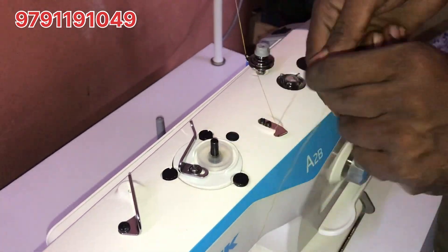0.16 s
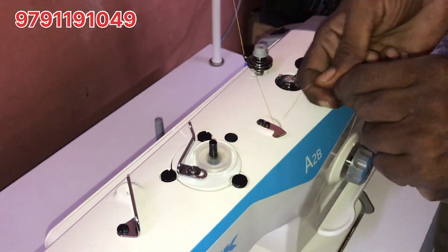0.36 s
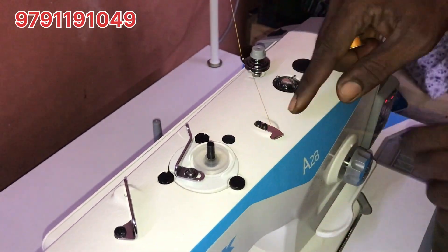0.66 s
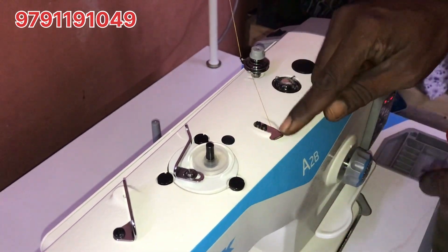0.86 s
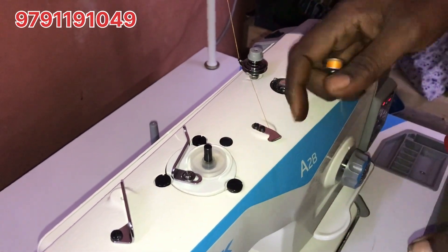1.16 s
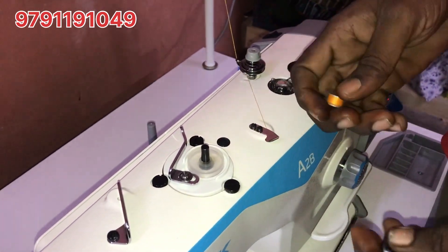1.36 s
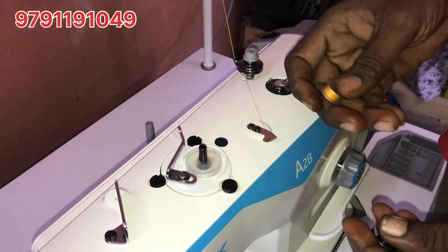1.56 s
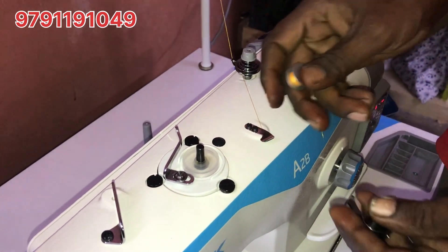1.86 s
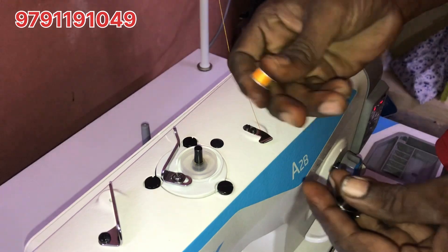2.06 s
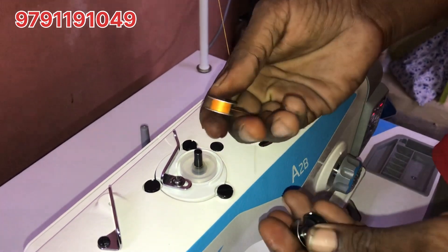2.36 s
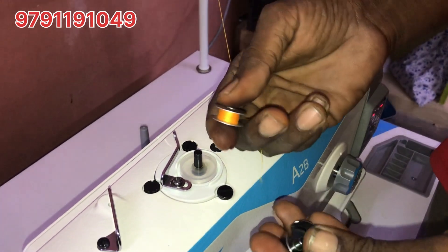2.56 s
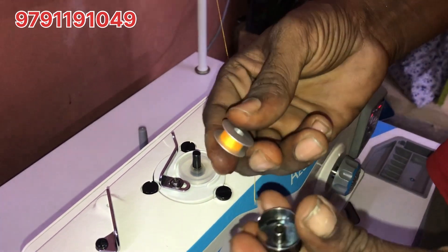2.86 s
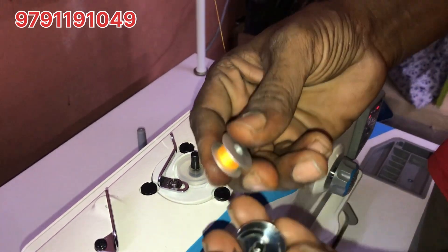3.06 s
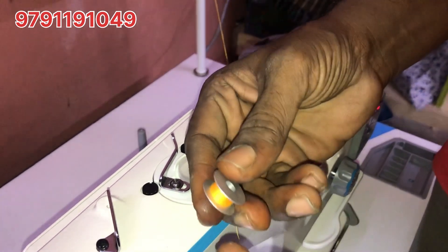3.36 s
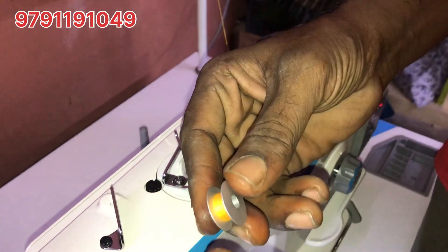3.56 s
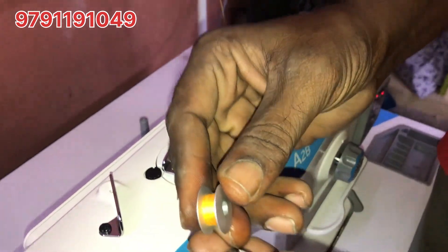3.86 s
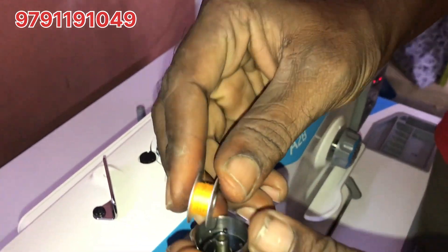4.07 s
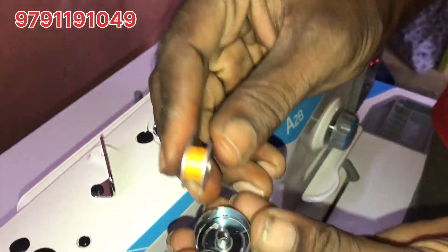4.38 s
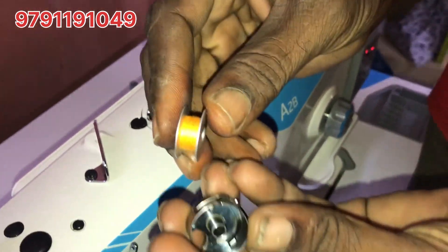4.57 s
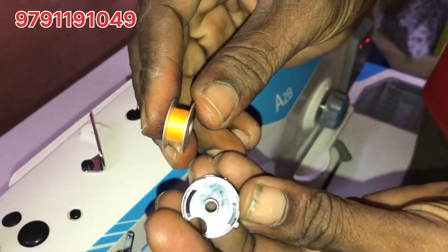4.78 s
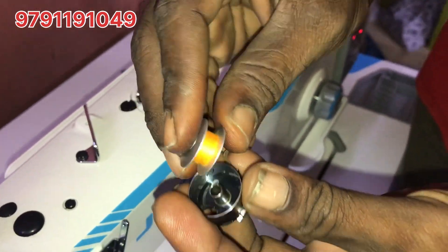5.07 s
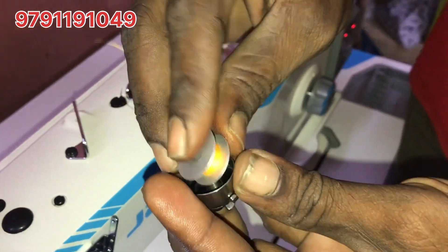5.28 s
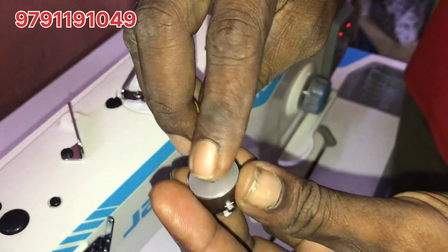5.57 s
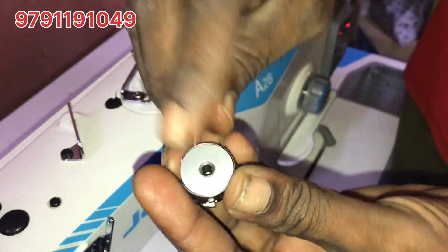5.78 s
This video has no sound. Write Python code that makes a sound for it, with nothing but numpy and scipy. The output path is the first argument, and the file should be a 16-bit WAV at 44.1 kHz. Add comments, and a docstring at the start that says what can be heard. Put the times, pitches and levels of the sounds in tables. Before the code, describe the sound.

A dull metallic clack dies away over a brief hiss of thread. An industrial sewing machine then clicks in, spurts up to speed, sags for a moment and picks up again. It runs fast and steady from there, with rapid clatter, a bright sizzle and a table-shaking hum, joined by buzz and whine. It is heard from close above the machine in a small workshop.

```python
"""A dull clack dies away over a brief hiss of thread; then an industrial sewing machine clicks in.
Heard from close above its head in a small workshop, it spurts, sags, then runs at about 3600 rpm.
The shaft shakes the table, the linkage clatters and the hook sizzles on every turn; a geared shaft
makes the pattern recur every seven turns. At steady speed the drive's rasp gives way to hum, buzz
and whine. Levels follow the speed, the pull of speeding up and the nearness of the microphone."""
import sys
import numpy as np
from scipy import signal
from scipy.fft import rfft, irfft, next_fast_len
from scipy.io import wavfile
from scipy.ndimage import map_coordinates

SR = 44100
rng = np.random.default_rng(int(sys.argv[2]) if len(sys.argv) > 2 else 0)


def waveform_to_disk(signal):
    """Save audio, clipped to [-1, 1], as 16-bit WAV at the path in sys.argv[1]."""
    frames = np.transpose(np.atleast_2d(signal))
    scaled = np.clip(frames, -1, 1) * 32767
    samples = np.round(scaled).astype(np.int16)
    wavfile.write(sys.argv[1], SR, samples)


N = 261292
TIME_S = np.arange(N) / SR
FULL_SPEED_HZ, GEAR_CYCLE_TURNS = 59.705, 7

# Main shaft speed. Each row: time in seconds, share of full speed.
SHAFT_SPEED = [(.315, 0), (.38, .6), (.435, 1), (.51, 1.005), (.61, .77), (.69, .55), (.75, .48), (.80, .8),
               (.835, 1.01), (.89, 1.022), (.97, 1.006), (1.15, 1)]
# Microphone nearness, rising overall. Each row: time in seconds, relative level of the shaft's hum in dB.
NEARNESS = [(1.1, -31.5), (1.35, -30.5), (2.17, -31), (3.97, -27), (5.9, -25)]
# Pitched modes of the clack. Each row: frequency in Hz, starting rms level in dB, T60 in seconds.
CLACK_MODES = [(552, -38, 0.45), (687, -31, 0.28), (896, -40, 0.28), (1310, -39, 0.29), (1810, -49, .3)]
# Dense modes of the clack. Each row: frequency in Hz, relative density in dB.
CLACK_SPECTRUM = [(88, -46), (150, -4.5), (477, -13), (687, -4), (742, -16), (1030, -13), (1200, -17),
                  (1320, -15.5), (1980, -18), (2140, -18), (2450, -23), (6060, -29), (15000, -46)]
# Thread hiss in the guides. Each row: frequency in Hz, relative density in dB.
THREAD_SPECTRUM = [(1500, -2), (3500, -2), (6500, -2), (7500, -8), (8500, -1), (9800, -20), (12300, -3),
                   (13300, -10), (14200, 0), (16000, -15)]
# Workshop background. Each row: frequency in Hz, relative density in dB.
ROOM_SPECTRUM = [(30, -36), (50, -3), (75, -7), (110, 6.5), (147, -10), (180, 3.5), (230, -16.5),
                 (650, -17), (1500, -27), (4000, -37.5), (9000, -35), (16000, -41)]
# Click of the drive. Each row: frequency in Hz, relative density in dB.
CLICK_SPECTRUM = [(400, -25), (1900, -2), (2600, -7), (3800, 1), (6000, -9), (8600, 1), (11000, -14),
                  (14000, 8), (16000, -10)]
# Rasp of the drive. Each row: frequency in Hz, relative density in dB.
RASP_SPECTRUM = [(1000, -8.5), (1500, -4), (1900, -4), (2300, -9), (2780, -2.5), (3300, -11), (4600, -29),
                 (7000, -38)]
# Machine rumble. Each row: frequency in Hz, relative density in dB.
RUMBLE_SPECTRUM = [(30, -30), (55, -14), (75, 13), (105, -11), (150, 1), (225, -29), (285, 6), (440, -19),
                   (550, 7), (680, 2), (850, -25)]
# Table and stand modes. Each row: frequency in Hz, width in Hz, gain over the direct shake in dB.
TABLE_MODES = [(95.4, 15, 12.5), (181.38, 3.5, 23), (297.3, 3.6, 12)]
# Shaft orders shaking the table. Each row: multiple of shaft rate, relative level at full speed in dB.
SHAKE_ORDERS = [(2, -10), (3, 0), (4, -20), (5, -15), (6, -26), (7, -24.5), (8, -36), (9, -25.5), (10, -25),
                (11, -16.5), (12, -25)]
# Linkage contacts. Each row: angle in turns, half-width in turns, relative clatter and sizzle in dB.
STROKES = [(.14, 0.1, -1, -14), (.40, 0.05, -11, -1), (.56, 0.12, 5, -2), (.66, 0.045, -1, -15),
           (.77, 0.015, -11, 0), (.90, 0.19, 0, -7)]
# Exactly recurring part of the roughness. Each row: frequency in Hz, share of power.
RECURRING_SHARE = [(500, 0.32), (1100, 0.25), (2200, 0.81), (5000, 0.55), (7500, 0), (10000, 0.05),
                   (14000, .05)]
# Peaks and notches of the cast head. Each row: frequency in Hz, width in Hz, gain in dB.
HEAD_MODES = [(2040, 78, 2), (2690, 130, -2), (3340, 180, 2.5), (5160, 210, -0.5), (4860, 360, -2.5),
              (6090, 270, 7), (7300, 160, 2), (9350, 460, 3), (10300, 450, -3)]
# Broad colour of the casting. Each row: frequency in Hz, relative gain in dB.
CASTING_SPECTRUM = [(240, -24.5), (400, -11), (449, -14.5), (469, -6), (643, -8.5), (846, -13),
                    (909, -12.5), (1200, -11.5), (1890, -9), (2160, -11), (2420, -6.5), (3620, -11),
                    (5190, -8.5), (5660, -16), (12500, -17), (16200, -29), (22000, -120)]
# Hook and needle bar sizzle. Each row: frequency in Hz, relative density in dB.
SIZZLE_SPECTRUM = [(11000, -14), (12500, -14), (13100, -2), (13900, 1), (14900, -8), (15400, -1.5),
                   (15700, 5.5), (16000, -6.5)]
# Low gear tones. Each row: nominal full-speed frequency in Hz, rms level in dB, dB per dB of nearness.
HUM_TONES = [(68.2, -49, -1.3), (127.9, -40, -1.9), (290, -46.5, -0.23), (375.3, -39.5, 0)]
# Colour of the high shaft orders. Each row: full-speed frequency in Hz, relative level in dB.
BUZZ_SPECTRUM = [(900, 1.5), (1100, -3), (1400, 1.5), (1950, 0.5), (2400, 0), (2650, -11), (3100, -1.5),
                 (4200, -7.5), (4650, -0.5), (5400, 1)]
# Gear and bearing partials.
# Each row: nominal full-speed frequency in Hz, rms level in dB, dB per dB of nearness.
WHINE_TONES = [(1075, -51, 1.8), (1135, -51, -1.1), (1373, -47.5, .5), (1851, -46.5, -.7), (1876, -44, -.7),
               (1911, -43, .3), (2422, -46, -.4), (2448, -40, -1.0), (2627, -44.5, -1.2), (3343, -45, -1.6),
               (4691, -44.5, .3), (4776, -45, -.7), (5135, -46, -.5), (5254, -46, -.1)]


def from_db(db):
    """Decibels to gain."""
    return 10 ** (np.asarray(db) / 20)


def unit_rms(x):
    """Scale to rms 1."""
    return x / np.sqrt(np.mean(x ** 2) + 1e-20)


def at_hz(spectrum, hz):
    """Read a spectrum on a log-frequency axis."""
    knots_hz, values = np.transpose(spectrum)
    return np.interp(np.log(np.maximum(hz, 1)), np.log(knots_hz), values)


def filtered(x, gain_at):
    """Apply a gain given as a function of Hz."""
    size = next_fast_len(N + SR)
    hz = np.arange(size // 2 + 1) * SR / size
    return irfft(rfft(x, size) * gain_at(hz), size)[:N]


def coloured(x, spectrum):
    """Shape x by a spectrum; rms 1."""
    return unit_rms(filtered(x, lambda hz: from_db(at_hz(spectrum, hz))))


def noise():
    """White noise."""
    return rng.standard_normal(N)


def drift(rate_hz):
    """Random wander, rms 1, with rate_hz new values a second."""
    knots = rng.standard_normal(1024)
    return unit_rms(np.interp(TIME_S * rate_hz, np.arange(len(knots)), knots))


def sine(cycles):
    """Sine of rms 1, random starting phase."""
    return np.sqrt(2) * np.sin(2 * np.pi * (cycles + rng.random()))


def lagged(x, lag_s):
    """One-pole lag."""
    pole = np.exp(-1 / (lag_s * SR))
    return signal.lfilter([1 - pole], [1, -pole], x)


def knock(spectrum, start_s, level_db, t60_s):
    """Metal knock whose dense modes decay together."""
    age_s = TIME_S - start_s
    envelope = (age_s >= 0) * from_db(level_db - 60 * np.maximum(age_s, 0) / t60_s)
    return envelope * coloured(noise(), spectrum)


def clack():
    """Dull knock on the machine with a few brief ringing tones."""
    ring = sum(from_db(db - 60 * TIME_S / t60_s) * sine(hz * TIME_S) for hz, db, t60_s in CLACK_MODES)
    return ring + knock(CLACK_SPECTRUM, start_s=0, level_db=-23.5, t60_s=.39)


def thread_hiss(end_s=.25, t60_s=.11, flutter_db=2.5):
    """Thread drawn through the guides hisses unevenly until the hand lets go."""
    release_db = -60 * np.maximum(TIME_S - end_s, 0) / t60_s
    return from_db(-50 + release_db + flutter_db * drift(32)) * coloured(noise(), THREAD_SPECTRUM)


def room_tone():
    """Steady, mostly low workshop background."""
    return from_db(-37.5) * coloured(noise(), ROOM_SPECTRUM)


def with_walls(x, t60_s=.22, wet_db=-7, gap_s=.004):
    """Close walls add a short dense tail."""
    age_s = TIME_S[:SR // 2]
    tail = rng.standard_normal(len(age_s)) * from_db(-60 * age_s / t60_s) * (age_s > gap_s)
    return x + from_db(wet_db) * signal.fftconvolve(x, tail / np.linalg.norm(tail))[:N]


def drive_click():
    """The drive engages with a short bright knock."""
    return knock(CLICK_SPECTRUM, start_s=.3125, level_db=-23.5, t60_s=.026)


def drive_rasp(speed, pull, settled):
    """The drive rasps while pulling up to speed and fades as it settles."""
    envelope = from_db(-47) * pull + from_db(-36) * np.sqrt(speed) * (1 - settled)
    return envelope * coloured(noise(), RASP_SPECTRUM)


def rumble(speed, pull):
    """Low noise that grows with speed and pull."""
    return (from_db(-40) * np.sqrt(speed) + from_db(-53) * pull) * coloured(noise(), RUMBLE_SPECTRUM)


def table_response(hz):
    """Complex gain: direct shake plus the table's modes."""
    return 1 + sum(from_db(db) / (1 + 2j * (hz - mode_hz) / width_hz)
                   for mode_hz, width_hz, db in TABLE_MODES)


def table_drone(turns, speed, pull, steady, near_db, jolt_db=1.1, waver_db=.24):
    """Shaft orders shake the ringing table; the pull jolts the low ones, the rest need steady speed."""
    force = 0
    for order, db in SHAKE_ORDERS:
        gain = from_db(db + waver_db * drift(8.2)) / np.abs(table_response(order * FULL_SPEED_HZ))
        drive = from_db(jolt_db * pull) if order <= 5 else steady
        force = force + gain * drive * sine(order * turns)
    return from_db(-22 + .47 * near_db) * filtered(force * speed ** 1.1, table_response)


def roughness(turns, period_turns):
    """Grain of metal faces that come round every period_turns."""
    grain = rng.standard_normal(int(period_turns * SR / FULL_SPEED_HZ))
    position = turns / period_turns % 1 * len(grain)
    return unit_rms(map_coordinates(grain, [position], order=3, mode="grid-wrap"))


def contact_force(turns, layer, sliding_db, spread_db):
    """Steady sliding plus each turn's strokes, no two equally hard."""
    power = from_db(sliding_db) ** 2
    for angle_turns, width_turns, clatter_db, sizzle_db in STROKES:
        stroke_db = clatter_db if layer == "clatter" else sizzle_db
        strengths = from_db(stroke_db + spread_db * rng.standard_normal(512))
        turn, phase = np.divmod(turns - angle_turns + .5, 1)
        pulse = np.exp(-((phase - .5) / width_turns) ** 2)
        power = power + strengths[turn.astype(int)] ** 2 * pulse
    return np.sqrt(power)


def head_response(hz):
    """Gain of the cast head's peaks and notches."""
    return from_db(sum(db / (1 + (2 * (hz - mode_hz) / width_hz) ** 2)
                       for mode_hz, width_hz, db in HEAD_MODES))


def linkage_clatter(turns, load, near_db, shaft_share=.025):
    """Contacts ride over recurring roughness and loose play, and sound through the cast head."""
    shaft = np.sqrt(shaft_share) * roughness(turns, 1)
    gear = np.sqrt(1 - shaft_share) * roughness(turns, GEAR_CYCLE_TURNS)
    recurring = filtered(shaft + gear, lambda hz: np.sqrt(at_hz(RECURRING_SHARE, hz)))
    play = filtered(noise(), lambda hz: np.sqrt(1 - at_hz(RECURRING_SHARE, hz)))
    contacts = (recurring + play) * contact_force(turns, "clatter", sliding_db=2.5, spread_db=1.9)
    head = coloured(filtered(contacts, head_response), CASTING_SPECTRUM)
    return from_db(-28.5 + .2 * near_db) * load ** 2.03 * head


def hook_sizzle(turns, load, near_db):
    """Small steel parts of the hook and needle bar spit bright bursts every turn."""
    bursts = noise() * contact_force(turns, "sizzle", sliding_db=-7, spread_db=1.5)
    return from_db(-33 + .74 * near_db) * load ** 2.9 * coloured(bursts, SIZZLE_SPECTRUM)


def shaft_unbalance(turns, speed, pull, near_db, jolt_db=1):
    """Unbalance hums at the shaft rate, growing steeply with speed."""
    return from_db(-29.5 + near_db + jolt_db * pull) * speed ** 5 * sine(turns)


def gear_tones(turns, tones, near_db, waver_db):
    """Partials locked to the gear cycle; each swells or fades as the microphone crosses its field."""
    total = 0
    for hz, db, near_slope in tones:
        order = np.round(hz / FULL_SPEED_HZ * GEAR_CYCLE_TURNS) / GEAR_CYCLE_TURNS
        total = total + from_db(db + near_slope * near_db + waver_db * drift(2.64)) * sine(order * turns)
    return total


def shaft_buzz(turns, near_db, waver_db=1.5):
    """High shaft orders between the whine partials, each wandering in level."""
    whine_orders = np.round(np.array(WHINE_TONES)[:, 0] / FULL_SPEED_HZ)
    total = 0
    for order in np.setdiff1d(np.arange(15, 91), whine_orders):
        colour_db = at_hz(BUZZ_SPECTRUM, order * FULL_SPEED_HZ)
        total = total + from_db(colour_db + waver_db * drift(1.3)) * sine(order * turns)
    return from_db(-51.5 - .14 * near_db) * total


def scene(load_lead_s=.031):
    """Machine and room, alike in both channels."""
    speed = np.interp(TIME_S, *np.transpose(SHAFT_SPEED))
    turns = np.cumsum(speed * (1 + .00021 * drift(8))) * FULL_SPEED_HZ / SR
    near_db = np.interp(TIME_S, *np.transpose(NEARNESS))
    near_db -= near_db.mean()
    # Speeding up loads the linkage and jolts the stand.
    speedup_per_s = np.maximum(np.gradient(speed) * SR, 0)
    load = speed + load_lead_s * lagged(speedup_per_s, lag_s=.004)
    pull = speed ** 2 * lagged(speedup_per_s, lag_s=.071)
    # At full speed these near 1 in turn: hum, buzz, whine.
    steady = lagged(speed ** 8, lag_s=.12)
    settled = lagged(steady, lag_s=.08) ** 3
    singing = lagged(steady, lag_s=.19) ** 3

    rasp = drive_rasp(speed, pull, settled)
    hum = steady * gear_tones(turns, HUM_TONES, near_db, waver_db=.4)
    whine = singing * gear_tones(turns, WHINE_TONES, near_db, waver_db=.6)
    buzz = settled * shaft_buzz(turns, near_db)
    low = rumble(speed, pull) + shaft_unbalance(turns, speed, pull, near_db)
    drone = table_drone(turns, speed, pull, steady, near_db)
    contacts = linkage_clatter(turns, load, near_db) + hook_sizzle(turns, load, near_db)
    metal = with_walls(clack() + drive_click() + rasp + contacts)
    mono = metal + low + drone + hum + buzz + whine + room_tone() + thread_hiss()
    return np.array([mono, mono])


def record(dry, cutoff_hz=15800):
    """Steep elliptic low-pass."""
    return signal.sosfilt(signal.ellip(12, .1, 80, cutoff_hz, fs=SR, output="sos"), dry)


dry = scene()
out = record(dry)
waveform_to_disk(out)
```